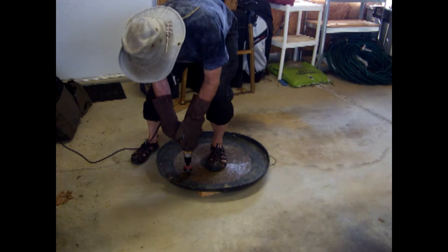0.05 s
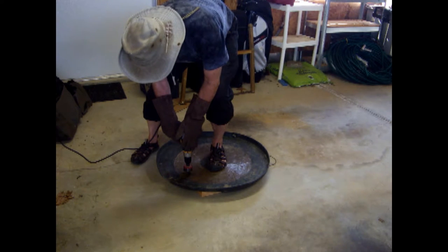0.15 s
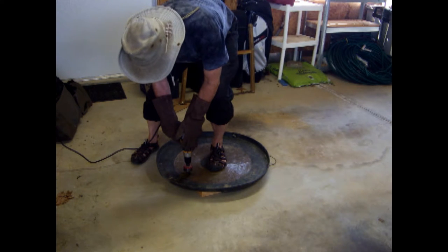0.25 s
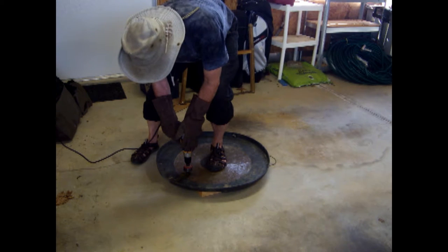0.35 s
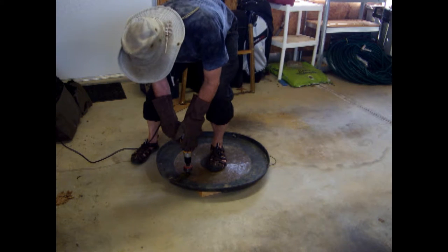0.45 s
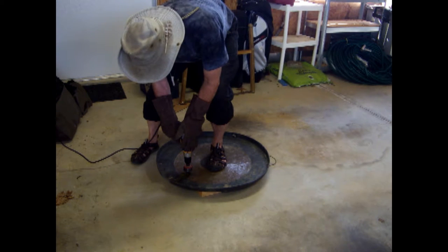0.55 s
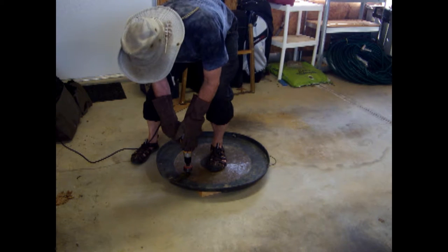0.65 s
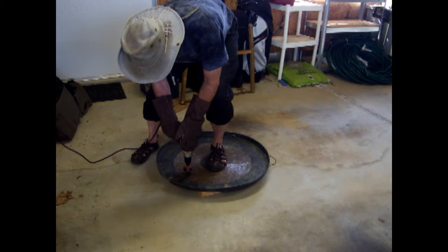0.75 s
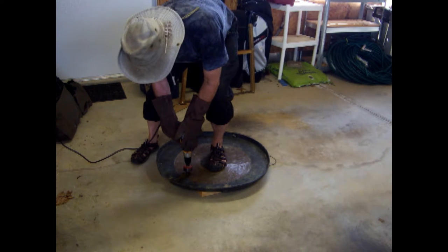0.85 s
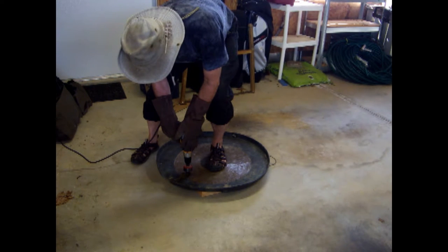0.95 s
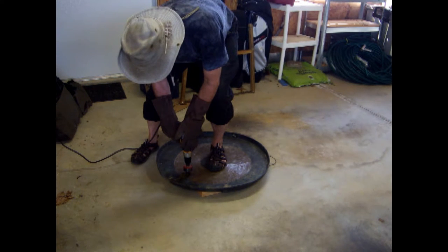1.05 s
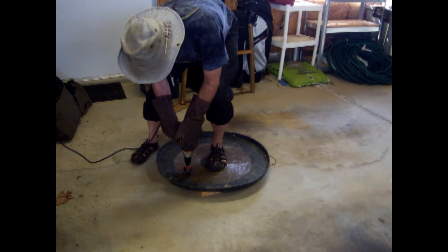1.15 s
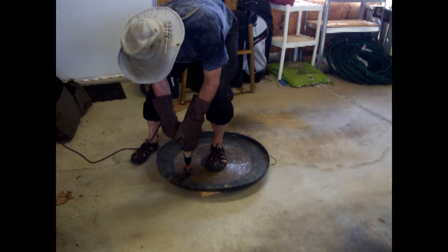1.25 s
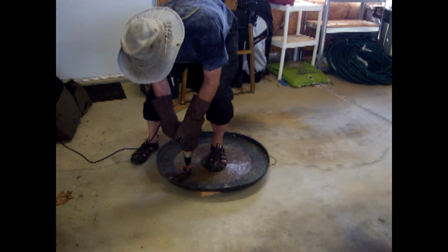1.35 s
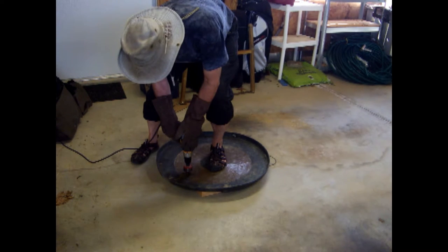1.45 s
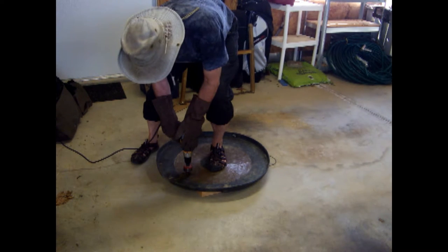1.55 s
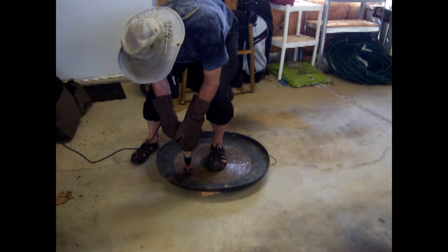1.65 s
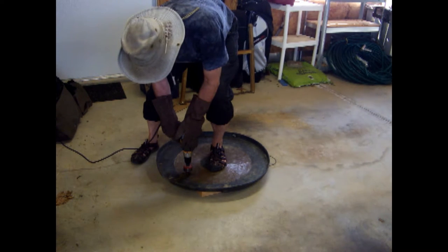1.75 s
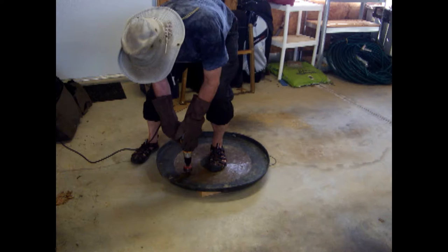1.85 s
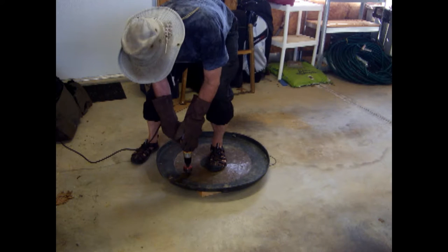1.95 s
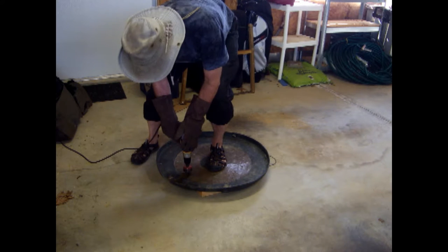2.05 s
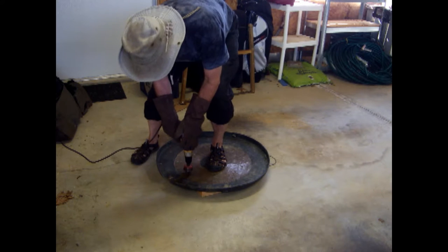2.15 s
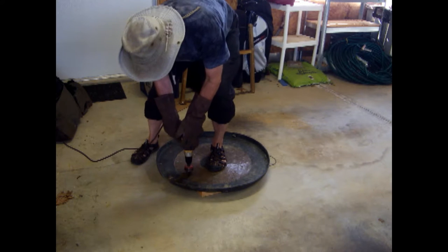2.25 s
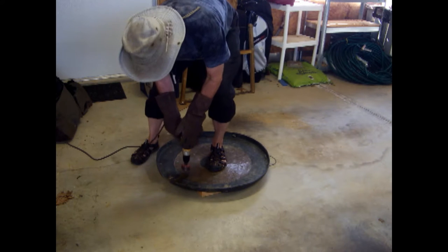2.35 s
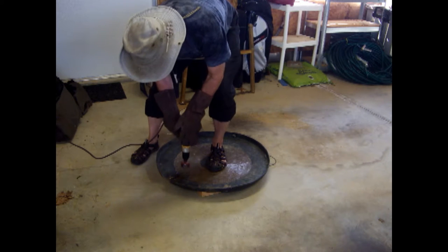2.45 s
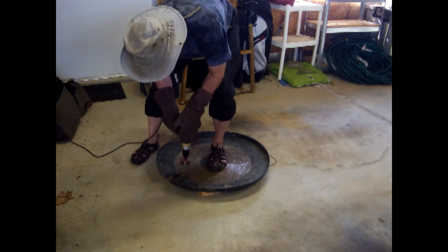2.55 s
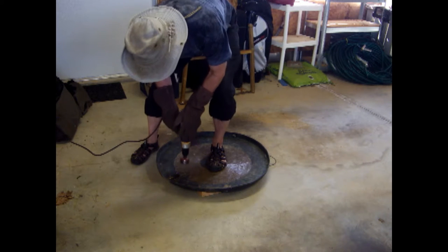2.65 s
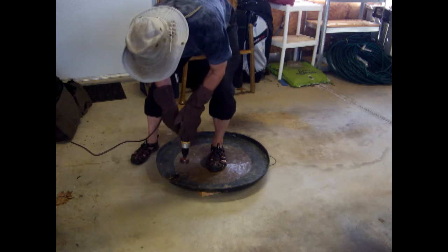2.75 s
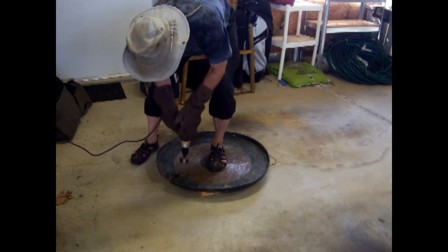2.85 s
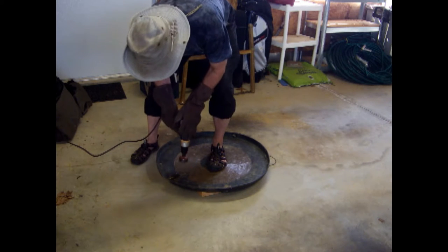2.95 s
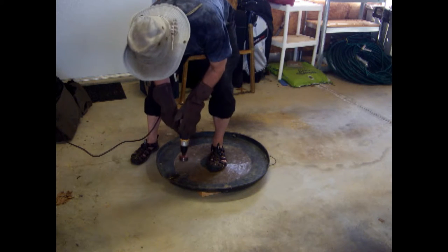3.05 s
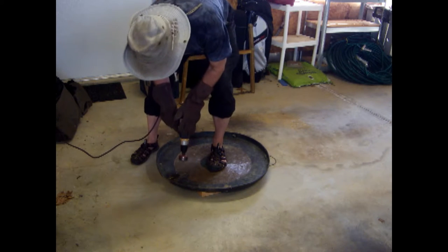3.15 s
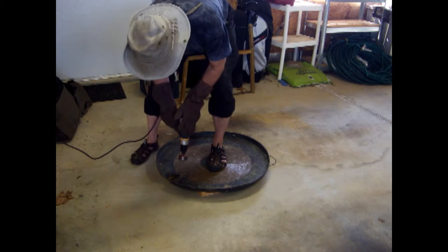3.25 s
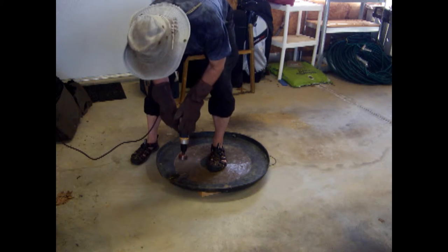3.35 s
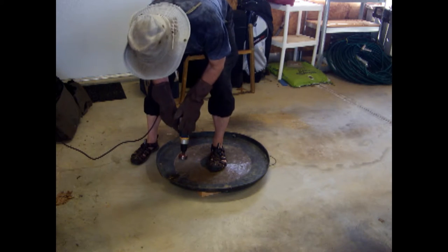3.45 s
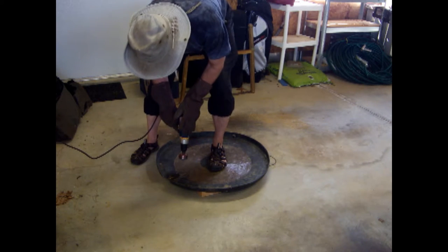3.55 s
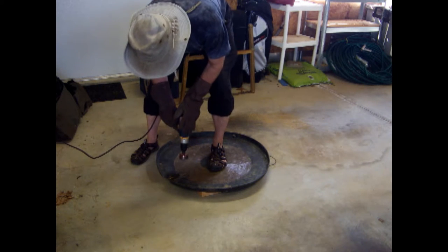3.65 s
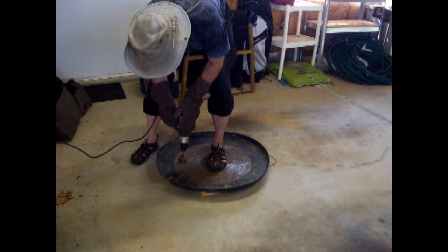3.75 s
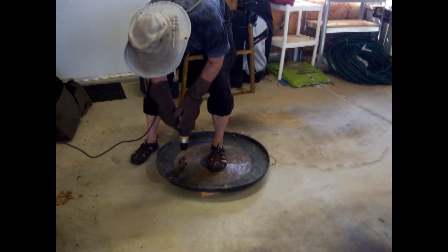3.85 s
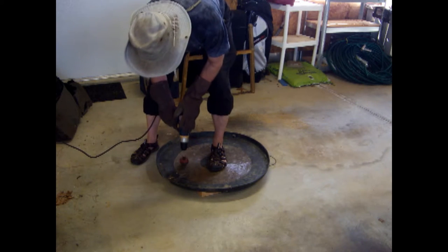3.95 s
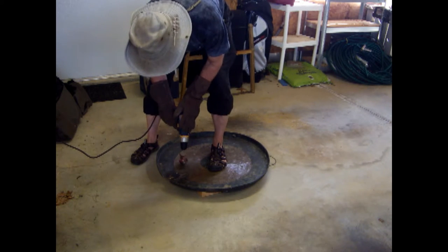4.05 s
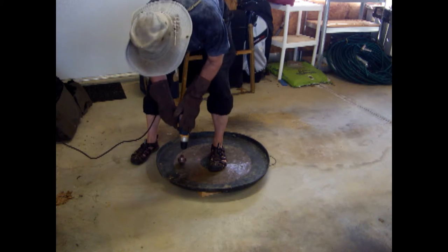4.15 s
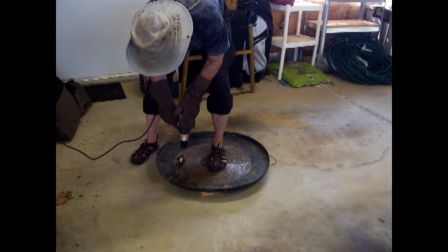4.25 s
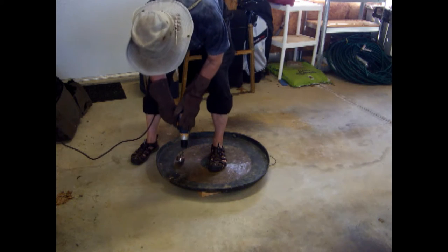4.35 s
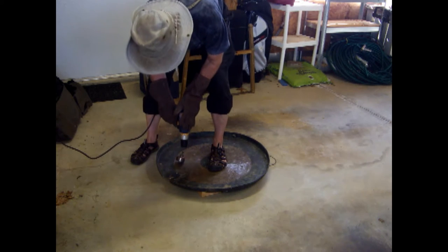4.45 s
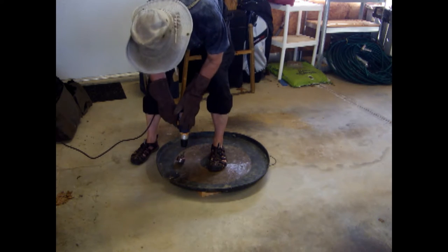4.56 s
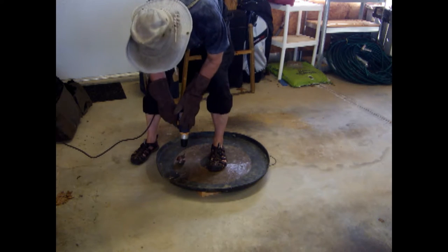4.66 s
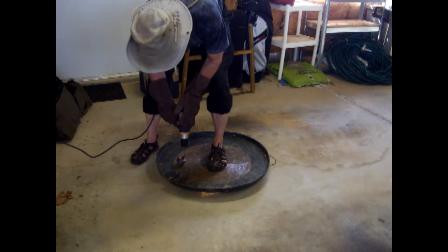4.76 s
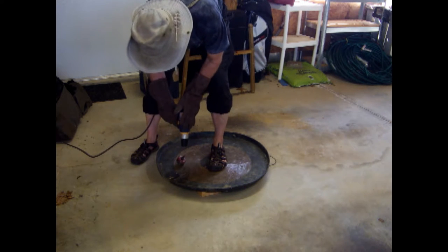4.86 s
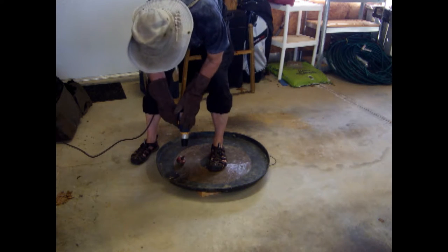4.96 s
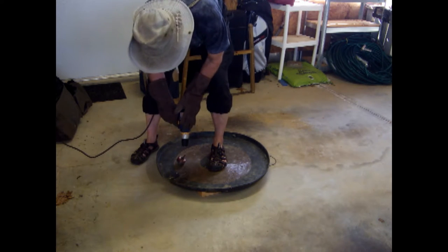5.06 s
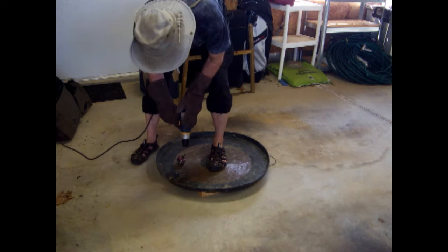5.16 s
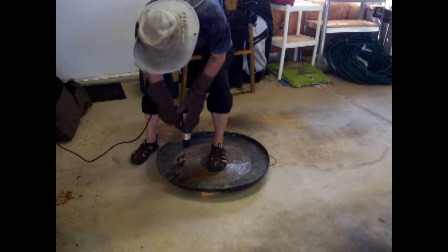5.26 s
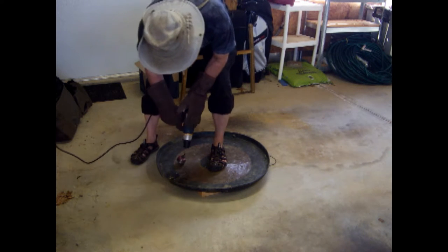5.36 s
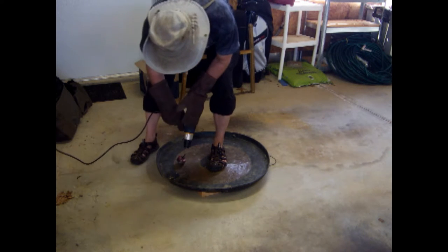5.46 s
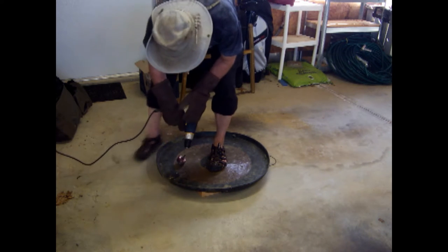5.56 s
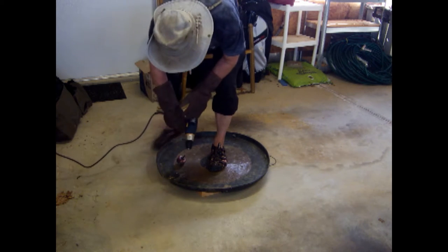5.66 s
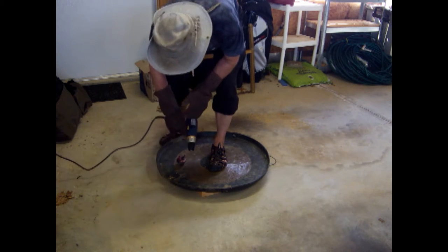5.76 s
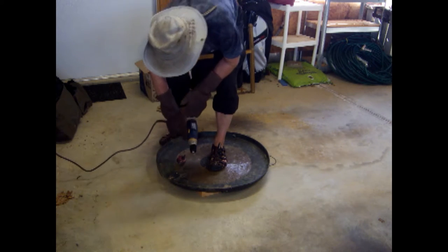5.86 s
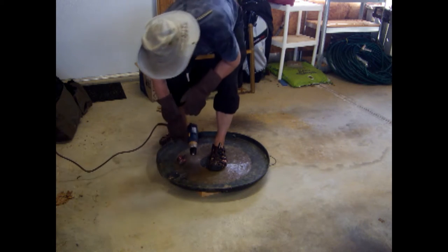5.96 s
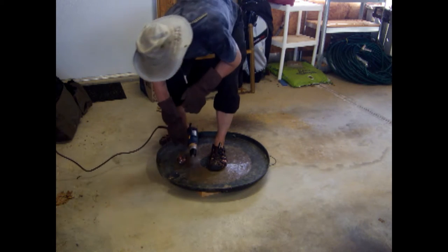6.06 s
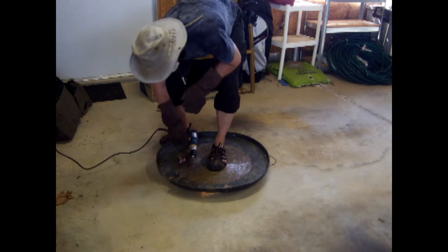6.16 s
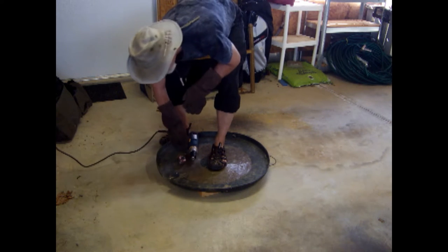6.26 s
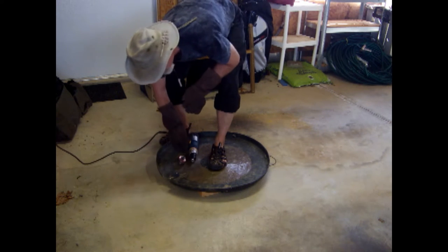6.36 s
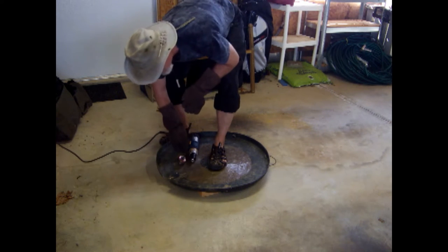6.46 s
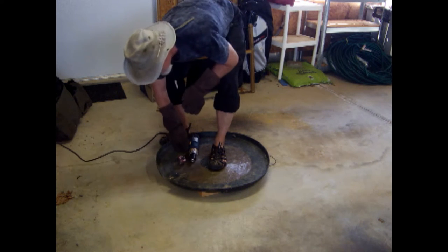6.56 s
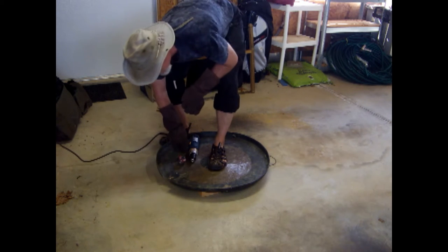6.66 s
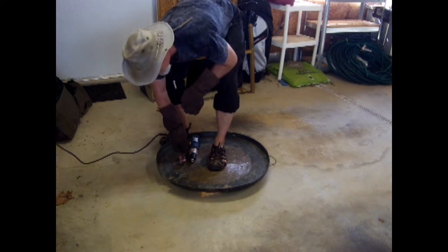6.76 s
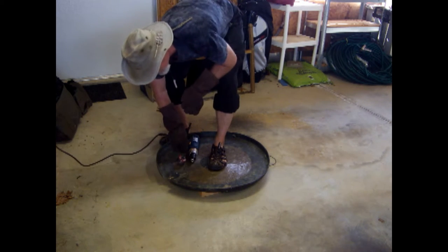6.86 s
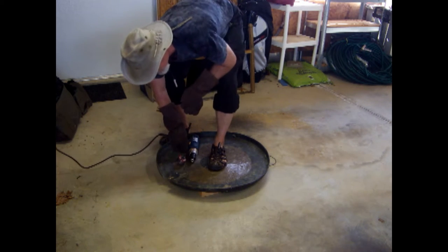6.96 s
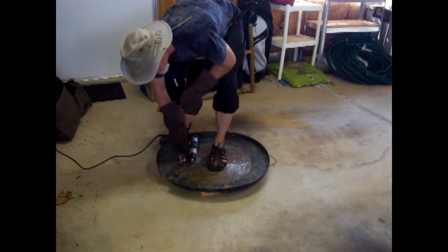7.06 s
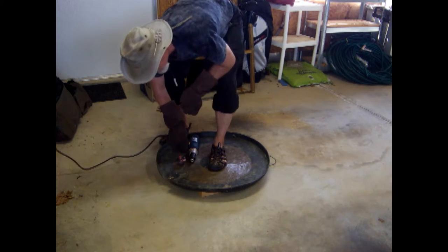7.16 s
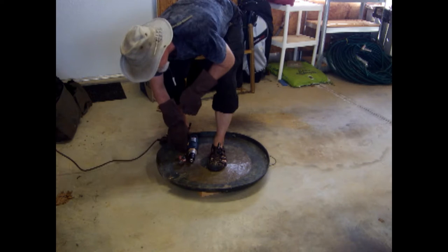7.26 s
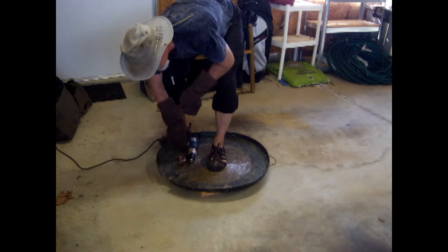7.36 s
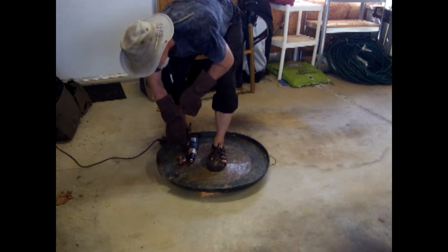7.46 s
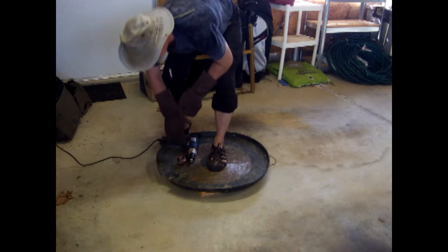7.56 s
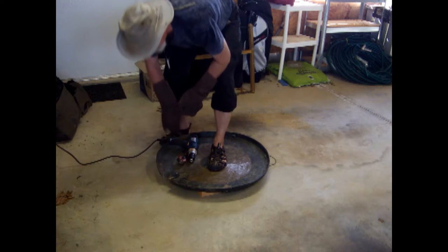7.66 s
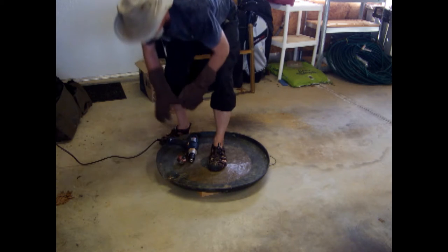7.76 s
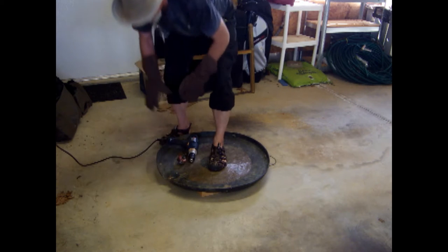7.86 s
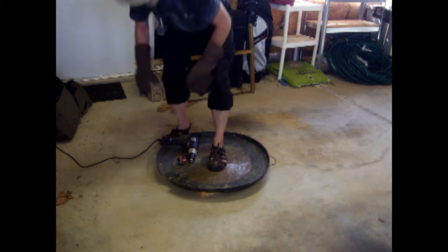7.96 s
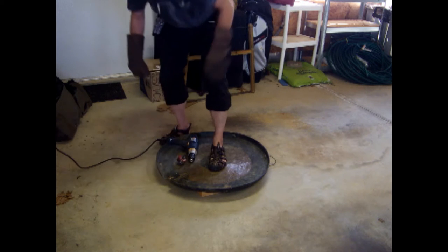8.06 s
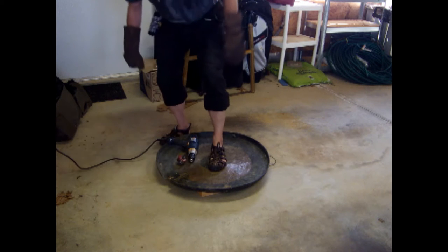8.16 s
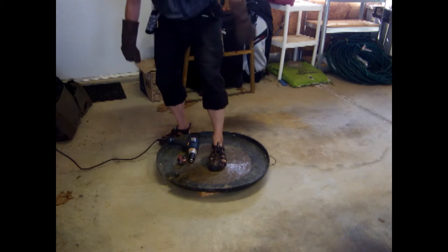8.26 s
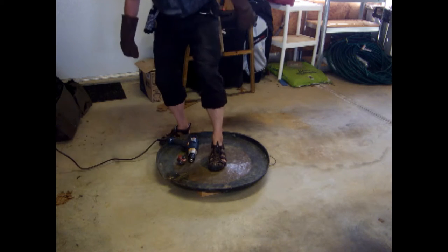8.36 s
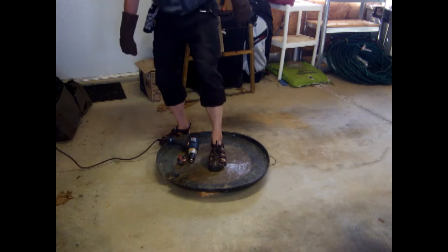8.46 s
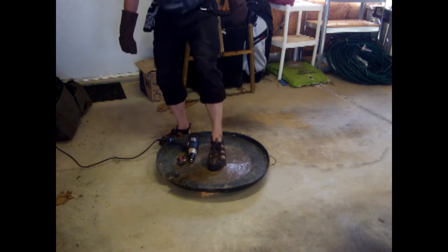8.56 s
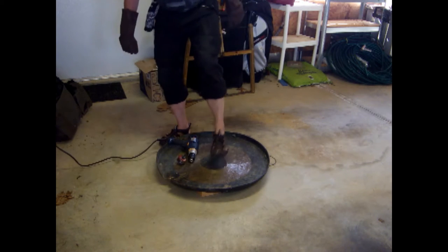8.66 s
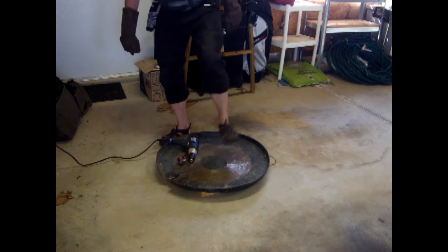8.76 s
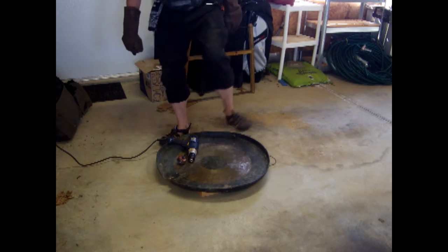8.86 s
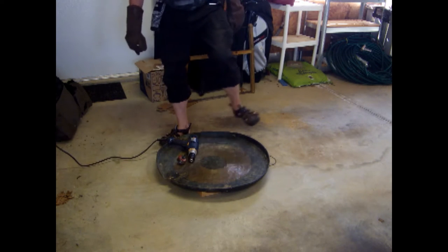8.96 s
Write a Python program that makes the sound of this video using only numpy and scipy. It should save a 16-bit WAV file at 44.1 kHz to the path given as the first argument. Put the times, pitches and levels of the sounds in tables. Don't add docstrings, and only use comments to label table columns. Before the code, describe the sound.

Dense metallic grinding and piercing gear whine fill the first few seconds, then the drill pitch sinks and the bit catches with a crack. The plate and room ring on briefly. Light clinks, a short scrape and two heavy metal blows follow as the tool is laid down, with a thin high steel ring after jolts. Soft shuffling and room hum at the end, picked up by one small microphone in a hard-walled garage.

```python
import sys
import numpy as np
from scipy import signal
from scipy.fft import rfft, irfft
from scipy.io import wavfile
from scipy.ndimage import uniform_filter1d

SR = 44100
rng = np.random.default_rng(int(sys.argv[2]) if len(sys.argv) > 2 else 0)


def nominal_scale(level):
    x = np.asarray(level, float) / 20
    return 10 ** x


def transcribe(signal):
    frames = np.atleast_2d(signal).T
    limited = np.clip(frames, -1, 1)
    pcm = np.round(limited * 32767).astype(np.int16)
    wavfile.write(sys.argv[1], SR, pcm)


N = 396890
T = np.arange(N) / SR
OFF_S, JAM_S, DROP_S = 2.24, 3.797, 7.2
EDGES_HZ = [700, 2200, 7300]


def unit(x):
    return x / np.sqrt(np.mean(x ** 2))


def walk(rate):
    hold = int(SR / rate)
    steps = np.repeat(rng.standard_normal(N // hold + 1), hold)
    slewed = uniform_filter1d(uniform_filter1d(steps, hold), hold)
    return unit(slewed[:N])


def spells(rows):
    power = 1e-30
    for s, db, rise, hold, fall in rows:
        rise_db = 60 * np.maximum((s - T) / rise, 0)
        fall_db = 60 * np.maximum((T - s - hold) / fall, 0)
        power = power + nominal_scale(db - rise_db - fall_db) ** 2
    return power


def colour_gain(size, colour, peaks=()):
    hz = np.arange(size // 2 + 1) * SR / size + 1
    at, db = np.transpose(colour)
    gain = nominal_scale(np.interp(np.log(hz), np.log(at), db))
    for peak_hz, width, peak_db in peaks:
        gain = gain * (1 + nominal_scale(peak_db) / (1 + ((hz - peak_hz) / width * 2) ** 2))
    return hz, gain


def tint(colour, size=N):
    gain = colour_gain(size, colour)[1]
    return unit(irfft(rfft(rng.standard_normal(size)) * gain, size))


def bands(x, colour, peaks=()):
    hz, gain = colour_gain(len(x), colour, peaks)
    below = [0 * hz] + [1 / (1 + (hz / edge) ** 16) for edge in EDGES_HZ] + [1 + 0 * hz]
    spectrum = rfft(x) * gain
    return [unit(irfft(spectrum * np.sqrt(upper - lower + 1e-12), len(x)))
            for lower, upper in zip(below, below[1:])]


def play(kinds, layers, flicker_db, rate):
    power = sum(nominal_scale(band_db)[:, None] ** 2 * spells(rows) for rows, band_db in kinds)
    return sum(np.sqrt(p) * nominal_scale(flicker_db * walk(rate)) * layer for p, layer in zip(power, layers))


def grit(spread_db, t60, direct):
    size_db = spread_db * np.clip(rng.standard_normal(N), -3, 3)
    chips = rng.standard_normal(N) * nominal_scale(size_db)
    t = T[:SR // 4]
    ring = uniform_filter1d(rng.standard_normal(len(t)), size=3) * 1000. ** (-t / t60)
    ring[0] = direct
    return signal.fftconvolve(chips, ring)[:N]


def ringing(table, t, longest):
    hz, db, t60 = np.transpose(table)[:, :, None]
    drift = np.cumsum(.025 * rng.standard_normal((len(table), len(t))), axis=1)
    decay = 1000. ** (-t / np.minimum(t60, longest))
    return hz[:, 0], nominal_scale(db - 3) * np.sin(2 * np.pi * hz * t + drift) * decay


def cutting():
    # (frequency [Hz], level [dB per Hz])
    fast_colour = [(160, -81), (270, -46), (524, -26), (561, -25.5), (632, -33), (872, -22), (1160, -3.5),
                   (1310, -9.5), (1720, -13.5), (2250, -15), (3760, -8), (4100, -6.5), (6710, -15),
                   (8090, -27.5), (10100, -25), (15700, -43)]
    slow_colour = [(160, -72), (270, -39), (481, -18.5), (872, -23.5), (1020, -3), (1360, -8),
                   (1940, -16.5), (2260, -17), (2870, -12.5), (3580, -10.5), (4610, -3), (6710, -19),
                   (7550, -29), (13200, -40.5), (15700, -53)]
    # (frequency [Hz], width [Hz], level [dB])
    fast_plate = [(1165, 60, 3), (1390, 40, -5), (3400, 60, -9), (4240, 60, -8), (4700, 700, -9),
                  (14200, 700, -3)]
    slow_plate = [(990, 130, 0), (4700, 250, -13)]
    full_db = [-50.5, -26, -22.5, -37.5]
    slow_loss_db = [1.5, -4, -1.1, -0.5]
    slow_s = np.maximum(T - 2.3, 0)
    turn = np.minimum(slow_s / 0.88, 1) * np.pi / 2
    fast = bands(grit(3.2, 0.11, 44.0), fast_colour, fast_plate)
    slow = bands(grit(4.2, 0.089, 46.0), slow_colour, slow_plate)
    cut = np.zeros(N)
    for db, loss_db, a, b in zip(full_db, slow_loss_db, fast, slow):
        level_db = db + loss_db * (slow_s / 1.38) ** 2 + 0.61 * walk(14)
        cut += nominal_scale(level_db) * (np.cos(turn) * a + np.sin(turn) * b)
    return cut * (T < JAM_S + .005)


def whine():
    # (time [s], speed [Hz])
    run = [
        (0.0, 572.7),
        (1.54, 570.9),
        (1.75, 570.0),
        (2.04, 567.2),
        (2.24, 571.2),
    ]
    # (multiple [1], level under the line they follow [dB])
    run_orders = [(6.5, -13), (12, -15), (13.5, -23)]
    # (multiple [1], level [dB], resonance [Hz], width [Hz], loose gear [0-1])
    coast_orders = [(1, -55, 460, 110, 1), (4, -28.5, 1080, 70, 1), (6.7, -37.5, 2400, 1100, 1),
                    (13.3, -37, 2950, 350, 1), (13.4, -35, 4600, 200, 1), (17, -44.5, 9000, 1800, 0),
                    (17, -39.5, 6400, 800, 0), (17, -35, 4600, 200, 1), (39, -52.5, 13200, 2800, 0)]
    # (time [s], level [dB], rise per 60 dB [s], hold [s], fall
    # per 60 dB [s])
    shaft_sings = [
        (0, -59, .1, 1.45, -5),
        (1.91, -52, -0.5, .01, .5),
    ]
    pinion_sings = [
        (0, -38, .1, .01, 1.1),
        (.77, -28, .5, .85, .3),
        (1.77, -28.5, .06, .01, .7),
        (1.96, -30, .07, .08, .5),
        (2.23, -33, .9, .01, .1),
    ]
    fan_sings = [
        (0, -41.5, .1, 1.6, .6),
        (1.9, -43.5, .5, 0.38, .1),
    ]
    coast_tau_s = 1.48
    hz = np.interp(T, *np.transpose(run)) * np.exp(-np.maximum(T - OFF_S, 0) / coast_tau_s)
    turns = np.cumsum(hz * (1 + 0.00031 * walk(29.45))) / SR
    loose = np.cumsum(hz * (1 + .006 * walk(40))) / SR
    shaft, pinion, fan = (10 * np.log10(spells(rows)) for rows in (shaft_sings, pinion_sings, fan_sings))
    powered = T < OFF_S
    coasting = (T >= OFF_S) & (T < JAM_S)
    lines = [(1, shaft, turns, powered), (17, fan, turns, powered), (7, pinion, turns, powered)]
    for k, db in run_orders:
        lines.append((k, np.maximum(pinion, fan + 8) + db, turns, powered))
    for k, db, at_hz, width, slack in coast_orders:
        resonance_db = -20 * np.log10(1 + ((k * hz - at_hz) / width) ** 4)
        lines.append((k, db + resonance_db, loose if slack else turns, coasting))
    waver = [walk(12), walk(17), walk(20)]
    out = np.zeros(N)
    for i, (k, db, phase, on) in enumerate(lines):
        waver_db = .5 if phase is turns else 2.5
        db = db + waver_db * np.roll(waver[i % 3], i * SR)
        audible = k * hz[on] < .45 * SR
        out[on] += np.sqrt(2) * nominal_scale(db[on]) * audible * np.sin(2 * np.pi * k * phase[on])
    return out


def shudder():
    # (time [s], level [dB], rise per 60 dB [s], hold [s], fall per 60 dB [s])
    swells = [
        (1.854, -48.5, .15, .14, .8),
        (2.282, -51, 0.96, 0.057, .3),
    ]
    # (frequency [Hz], level [dB per Hz])
    colour = [(24, -43), (40, -15), (64, -9), (108, -18), (162, 2), (226, -31), (274, -4), (353, 9),
              (450, -0.5), (580, -35), (990, -120)]
    return np.sqrt(spells(swells)) * tint(colour)


def jam_snap():
    # (time [s], level [dB], length [s])
    s, db, length = (3.7968, -5, .0042)
    # (frequency [Hz], level [dB per Hz])
    colour = [(30, -36), (150, -14), (1500, -3), (4500, 0), (8000, -11), (15700, -24)]
    jam = nominal_scale(db) * tint(colour) * (T > s) * np.exp(-np.clip((T - s) / length, 0, 9) ** 4)
    edge = np.diff(jam, prepend=0) * np.exp(-np.clip((T - s) / .001, 0, 30))
    return jam + .5 * edge


def trigger_switch():
    # (time [s], level [dB], frequency [Hz], width [Hz], t60 [s])
    s, db, hz, width, t60 = (4.935, -48, 6900, 650, .17)
    band = tint([(hz - 2 * width, -40), (hz - width / 2, 0), (hz + width / 2, 0), (hz + 2 * width, -40)])
    return nominal_scale(db) * band * (T > s) * 1000. ** (-np.clip(T - s, 0, 9) / t60)


def scrape():
    drag = [
        (5.614, -22.5, 0.21, 0.071, 0.33),
    ]
    drag_db = [-34, -13, 0.5, -6]
    scuff = [
        (4.22, -43, 0.67, 0.031, 0.63),
        (5.47, -50.5, 0.058, 0.089, 0.69),
    ]
    scuff_db = [-30, -0.6, -8, -12]
    # (frequency [Hz], level [dB per Hz])
    colour = [(59, -66), (100, -61), (884, -38), (1070, -10), (1350, -20), (1470, -6), (1810, -10),
              (2540, -9.5), (4500, 7.5), (6450, -12), (7480, -28), (14100, -40), (15700, -55)]
    layers = bands(grit(5.1, .05, 31.0), colour)
    return play([(drag, drag_db), (scuff, scuff_db)], layers, 1.3, 40)


def knocks():
    # (time [s], level [dB], boom over it [dB], crack over it [dB])
    light = [(4.119, -33, -11, 3), (4.2, -40.5, 0, 10), (4.983, -49, -5, 9), (5.053, -46, 2, 12),
             (5.125, -47.5, 6, 12), (5.228, -60, 15.5, 19), (5.334, -48, 3.5, 12), (5.456, -41, 1, 12),
             (5.511, -30.5, -9.5, -1), (5.894, -43, 5.5, 16), (6.001, -37.5, -2, 10), (6.201, -40.5, 1, 11),
             (6.335, -53, 11, 15), (6.47, -35, -2, 2), (6.651, -48, 3, 16), (6.753, -45, 2, 11),
             (7.08, -47.5, 4, 11.5), (7.169, -56, 7, 8), (7.449, -46, 1, 12), (7.615, -55, -4.5, 20),
             (7.869, -52, -4, 17), (8.024, -55, -6, 15), (8.111, -51, -3, 8), (8.234, -58.5, 12, 19),
             (8.39, -54.5, 6, 17), (8.498, -53, 2, 8)]
    # (time [s], level [dB], boom over it [dB], crack over it [dB], body over it [dB])
    heavy = [
        (6.374, -21.5, -8.5, 6.6, 2),
        (7.223, -14.5, -7, 13, -3),
    ]
    # (frequency [Hz], level [dB], t60 [s])
    tap_modes = [(330, -6, .5), (440, -6, .5), (540, -4, .5), (650, -9, .5), (1130, 6, .4), (1200, 0, .4),
                 (2320, -5, .3), (2900, -8, .3), (3250, -4, .25), (1650, -3, .3), (3720, -5, .25),
                 (4250, -4, .25), (5100, -5, .2), (5820, -7, .2)]
    drop_modes = [(321, 3, 0.59), (516, 0.5, 1.0), (952, -22, 1.3), (1080, -2, 0.86), (1240, -8, 0.64),
                  (1186, -3.5, 1.3), (1500, -8, 0.74), (1630, -8, 0.21), (1890, -2, 0.36),
                  (2070, -11, 0.97), (2627, -19, 0.63), (4620, 4.5, 0.18), (5020, -19, 0.87),
                  (5100, 1, 0.14)]
    # (frequency [Hz], level [dB per Hz])
    tail_colour = [(88, -72), (150, -101), (327, 8), (881, -11.5), (1050, -1), (1780, -12), (2030, -11.5),
                   (3580, -6.5), (4610, -3), (9840, -30.5), (15700, -53)]
    crack_colour = [(40, -60), (150, -15), (400, -27), (1100, 7), (4500, 8.5), (8000, -13), (15700, -21)]
    tail_t60_s = [0.66, 0.46, 0.35, 0.37]
    size = SR * 4 // 5
    out, t = np.zeros(N + size), T[:size]
    tap, drop = ringing(tap_modes, t, .5), ringing(drop_modes, t, .8)
    fades = [1000. ** (-t / t60) for t60 in tail_t60_s]
    tails = bands(rng.standard_normal(N), tail_colour)
    cracks = tint(crack_colour)
    taps = [(s, db, boom, crack, -6 + 0.55 * boom) for s, db, boom, crack in light]
    for s, db, boom, crack, body in taps + heavy:
        start = int(s * SR)
        at = slice(start // 2, start // 2 + size)
        gains = nominal_scale(db + np.array([boom, body, 0, -18]) - 8.5)
        hit = sum(gain * tail[at] * fade for gain, tail, fade in zip(gains, tails, fades))
        mode_hz, modes = tap if s < DROP_S else drop
        mode_gains = nominal_scale(2 * rng.standard_normal(len(mode_hz))) * gains[np.searchsorted(EDGES_HZ, mode_hz)]
        hit += mode_gains @ modes
        hit *= 1 - np.exp(-t / 0.001)
        hit += nominal_scale(db + crack - 10.5) * cracks[at] * np.exp(-t / 0.004)
        out[start:start + size] += hit
    return out[:N]


def chuck():
    # (time [s], level [dB])
    jolt_rows = [(3.9, -50), (4.119, -42), (4.2, -47), (5.053, -64), (5.125, -65), (5.334, -58),
                 (5.456, -56), (5.511, -47), (5.894, -56), (6.201, -53), (6.374, -45), (6.651, -64),
                 (6.753, -58), (7.169, -53), (7.223, -46), (7.449, -58), (7.615, -62), (7.79, -60),
                 (8.024, -63), (8.234, -65), (8.39, -64)]
    low_hz, high_hz, high_db, t60_s = 6460, 10100, -15, 0.58
    jolts, t = np.zeros(N), T[:SR]
    s, db = np.transpose(jolt_rows)
    jolts[(s * SR).astype(int)] = nominal_scale(db)
    ring = np.sin(2 * np.pi * low_hz * t) + nominal_scale(high_db) * np.sin(2 * np.pi * high_hz * t)
    ring *= 1000. ** (-t / t60_s)
    return signal.fftconvolve(jolts, ring)[:N] * nominal_scale(2.6 * walk(30))


def shuffle():
    jam_tail = [
        (3.803, -21.5, 0.0034, .005, 0.12),
        (3.82, -30, .01, 0.009, 1.04),
    ]
    jam_db = [-13, -7, -1.5, -11.5]
    plate_hum = [
        (3.82, -42, .01, .01, 3.3),
        (4.7, -54, .2, .01, 2.7),
        (6.57, -42, 1.1, .01, .9),
        (7.3, -36, 0.33, .01, .55),
    ]
    hum_db = [-1.4, -11, -13.5, -35]
    last_spin = [
        (4.22, -39.5, 0.75, .01, 0.98),
        (4.4, -48.5, 0.75, 0.38, 0.87),
    ]
    spin_db = [-32, -9.5, 0.8, -14]
    echo = [
        (5.7, -26, .4, .02, 0.74),
        (5.49, -48, 0.82, .01, .6),
    ]
    echo_db = [-36, -15, -2.2, -24]
    drop_echo = [
        (7.32, -37, 0.42, .01, 0.73),
    ]
    drop_db = [-15, -1.2, -3, -26]
    cloth = [
        (4.95, -64.5, .3, 2.2, 1),
        (7.68, -59, 0.57, .25, .9),
        (8.03, -59, .1, 0.0088, 0.18),
        (8.17, -58, 0.34, .01, 0.49),
        (8.25, -63, .5, .8, .9),
    ]
    cloth_db = [-0.5, -0.5, 1.5, -12]
    # (frequency [Hz], level [dB per Hz])
    colour = [(120, -70), (200, -39), (339, -1.5), (594, -7), (870, -18), (1100, 2), (1340, -8.5),
              (1860, -8), (3160, -3), (4620, 2), (5640, -9), (6640, -11), (7680, -27.5), (10300, -28.5),
              (15300, -60)]
    kinds = [(jam_tail, jam_db), (plate_hum, hum_db), (last_spin, spin_db), (echo, echo_db),
             (drop_echo, drop_db), (cloth, cloth_db)]
    return play(kinds, bands(grit(3.2, 0.15, 44.0), colour), 1.37, 16) * (T > JAM_S)


def thuds():
    # (time [s], level [dB], frequency [Hz], length [s])
    steps = [
        (1.9, -60, 60, .15),
        (2.35, -61.5, 48.7, 0.39),
        (3.952, -64, 48, 0.31),
        (6.422, -57, 54.8, 0.12),
        (6.72, -54, 49, 0.094),
    ]
    return sum(nominal_scale(db) * np.sin(2 * np.pi * hz * T) * np.exp(-((T - s) / length) ** 2)
               for s, db, hz, length in steps)


def noise_floor():
    # (frequency [Hz], level [dB per Hz])
    colour = [(15, -9), (60, -0.5), (150, -2), (300, -4), (1000, -8), (6000, -17.5), (12000, -19),
              (15000, -19.5), (15800, -36)]
    recover_s, recover_length_s = 4.72, 0.79
    drill_duck_db = -11.5 * np.clip(1 - (T - recover_s) / recover_length_s, 0, 1)
    drop_duck_db = -4 * np.exp(-((T - DROP_S - .15) / 0.22) ** 2)
    return nominal_scale(-56.5 + drill_duck_db + drop_duck_db) * tint(colour)


def scene():
    drill = cutting() + whine() + shudder() + jam_snap() + trigger_switch()
    handling = scrape() + knocks() + chuck()
    background = shuffle() + thuds() + noise_floor()
    return np.tile(drill + handling + background, (2, 1))


def band_limit(x):
    return signal.sosfilt(signal.butter(12, 15840, fs=SR, output="sos"), x)


def record(dry):
    flat = dry / (1 + (dry / 0.43) ** 6) ** (1 / 6)
    top_hz = 15600
    mix = signal.sosfilt(signal.butter(8, top_hz, fs=SR, output="sos"), flat)
    return band_limit(mix)


dry = scene()
out = record(dry)
transcribe(out)
```